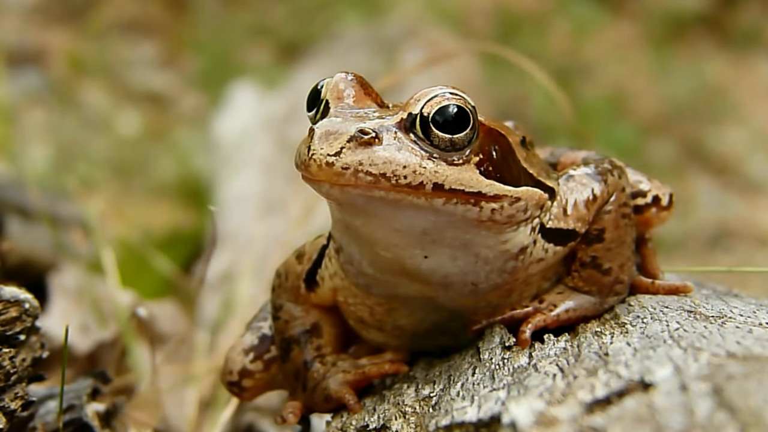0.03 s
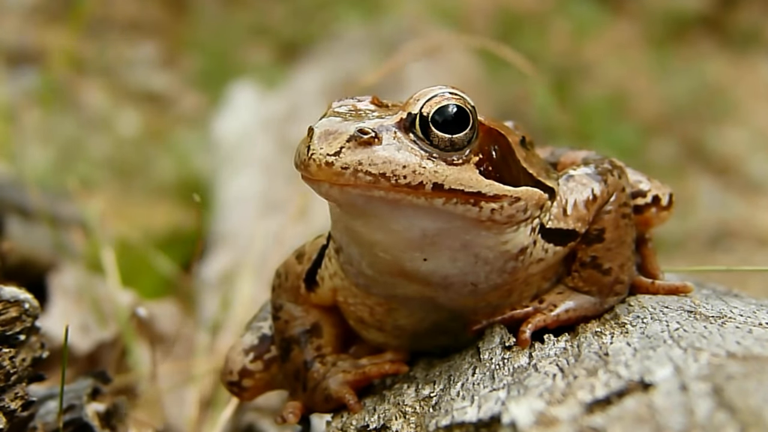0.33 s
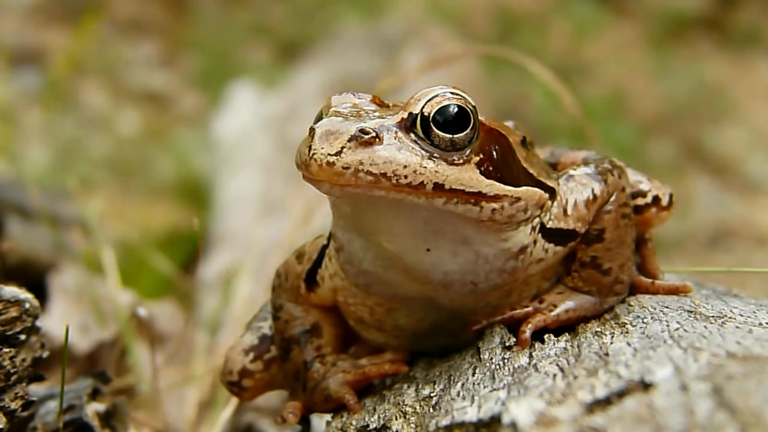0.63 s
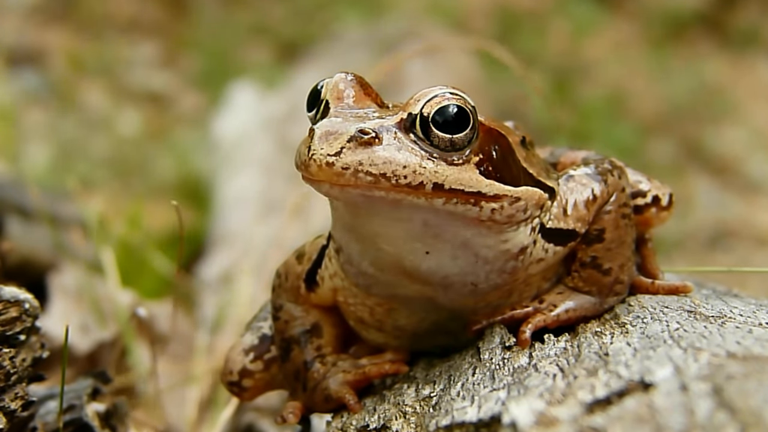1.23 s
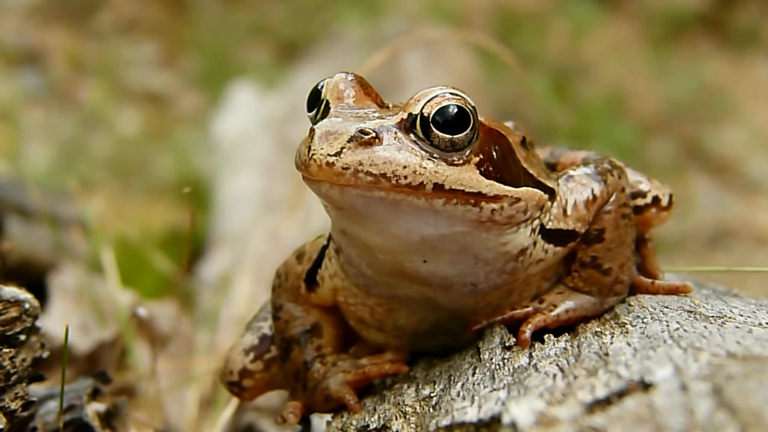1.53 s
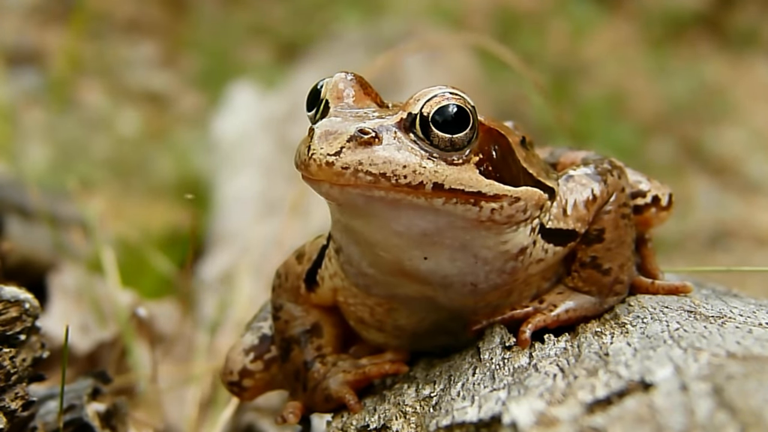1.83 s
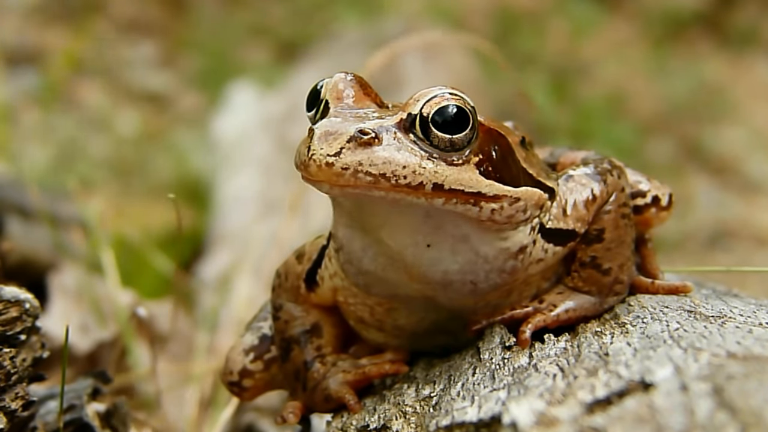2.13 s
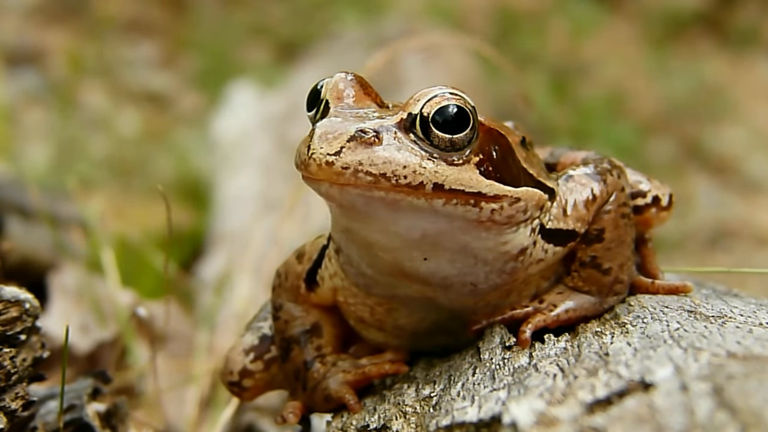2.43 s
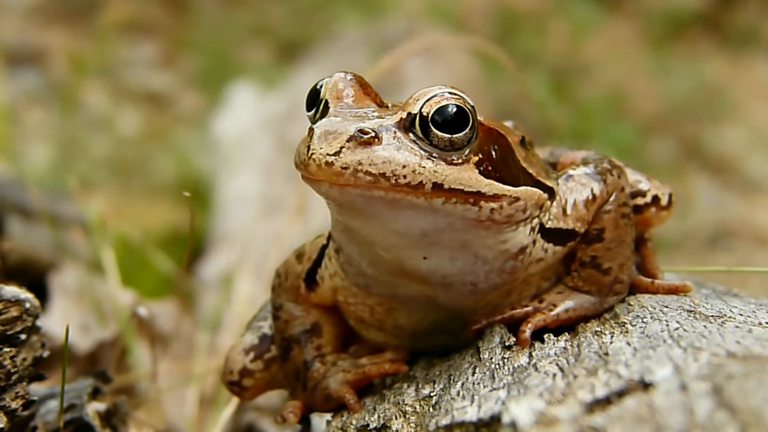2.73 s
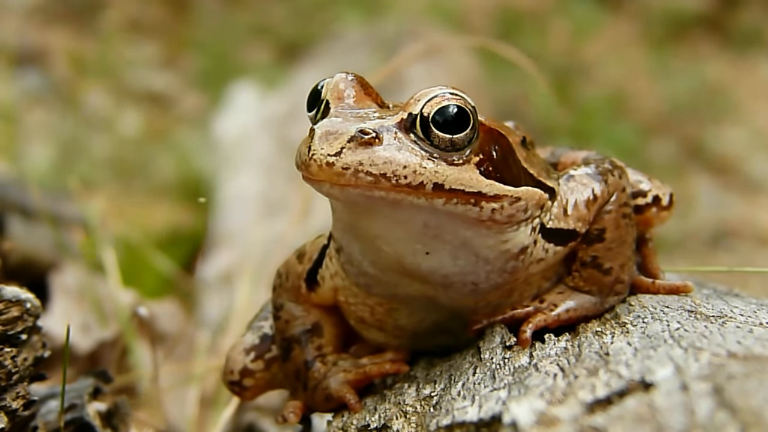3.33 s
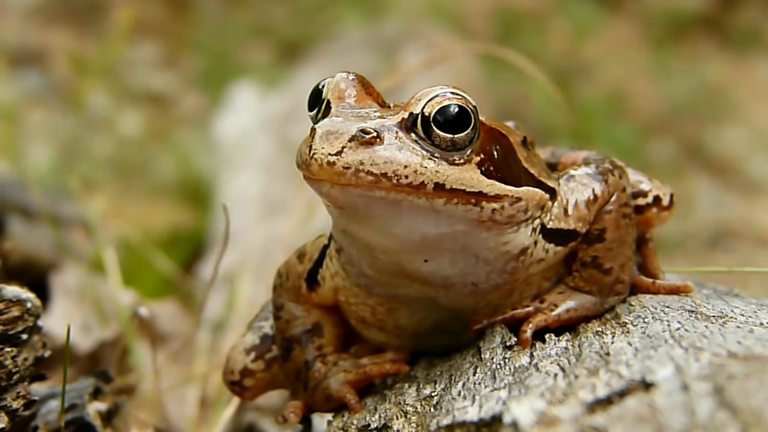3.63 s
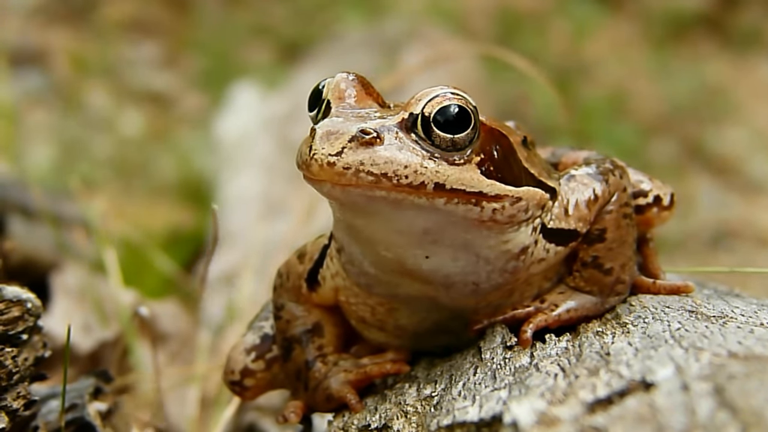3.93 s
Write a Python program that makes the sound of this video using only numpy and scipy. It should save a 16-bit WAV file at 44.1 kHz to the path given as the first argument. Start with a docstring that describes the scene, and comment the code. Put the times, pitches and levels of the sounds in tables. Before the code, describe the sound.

Gusty wind rumbles and thumps on a stereo microphone close to the ground outdoors. Dry leaves rustle and snap faintly to the right, and in the second half an insect chirps softly in the grass.

```python
"""Gusty wind buffets a stereo microphone close to the ground: turbulence rumbles on its two ports
and single eddies thump against them. Further off the air hisses, a few faint hollow tones sound
in the distance, and dry leaves rustle and snap to the right. In the second half an insect in the
grass chirrs faintly, each chirp a tick and a run of scraping strokes."""
import sys
import numpy as np
from scipy import signal
from scipy.io import wavfile

SR = 44100
rng = np.random.default_rng(int(sys.argv[2]) if len(sys.argv) > 2 else 0)


def pcm_store(signal):
    """Save signal as 16-bit PCM."""
    levels = np.round(np.clip(np.atleast_2d(signal), -1, 1) * 32767)
    wavfile.write(sys.argv[1], SR, levels.astype(np.int16).T)


N = 176400
T = np.arange(N) / SR

# Spectra give relative level per Hz. Pan is left minus right. Likeness 1 is the same on both sides.
# distant air: f/Hz, level/dB
AIR_SPECTRUM = [(30, -2.5), (150, -2), (420, 9.5), (560, -1.5), (850, 3), (1500, -7.5), (2400, -8),
                (3600, -9), (5200, -7), (6600, -10.5), (7600, -14.5), (9200, -30.5)]
# stereo image of the air: f/Hz, likeness
AIR_IMAGE = [(60, 0.93), (300, 0.66), (480, 0.043), (850, 1), (1500, 0.98), (3500, 0.72), (6000, 0.9),
             (10000, 0.015)]
# hollow tones far off: t/s, length/s, f/Hz, level/dB
DISTANT_TONES = [(1.408, 0.048, 770, -46), (3.184, .05, 675, -52), (3.515, 0.049, 736, -50),
                 (3.582, 0.023, 705, -45.5), (3.81, 0.093, 758, -52)]
# leaf rustle: f/Hz, level/dB
LEAF_SPECTRUM = [(400, 3.5), (1200, 2), (1900, 5.5), (2800, 4.5), (3500, -6.5), (5000, -2.5), (6600, -11),
                 (7400, -31)]
# rise and fall of the rustle: t/s, level/dB
LEAF_SWELL = [(0, 2.5), (1.0, -1.5), (1.6, 1.5), (2.3, 2.5), (3.2, 0), (4, 2.5)]
# dry leaves snapping: t/s, level/dB, f/Hz, bandwidth/Hz
LEAF_SNAPS = [(0.079, -34, 2160, 900), (0.087, -41, 5900, 2950), (0.344, -32, 2600, 990),
              (.752, -43, 2980, 2500), (0.826, -34, 2280, 1290), (.859, -51, 3940, 4000),
              (0.886, -36.5, 3100, 3430), (0.973, -39, 2870, 2000), (1.109, -46, 4700, 800),
              (1.13, -36, 5000, 800), (1.736, -43.5, 5040, 3020), (1.821, -37.5, 3130, 800),
              (1.880, -36, 2520, 1190), (2.207, -36.5, 2830, 700), (2.634, -35.5, 2140, 900),
              (2.761, -38, 2800, 700), (3.074, -34.5, 2100, 1300), (3.569, -35.5, 1900, 700),
              (3.596, -34.5, 2460, 600), (3.904, -38.5, 3200, 700)]
# the insect's chirps: t/s, length/s, level/dB
INSECT_CHIRPS = [(2.229, 0.054, -52), (2.319, .06, -50), (2.41, 0.068, -47.5), (2.501, 0.11, -50.5),
                 (2.589, 0.087, -50.5), (2.7, 0.089, -48), (2.811, 0.066, -47.5), (2.904, 0.067, -46.5),
                 (2.997, 0.068, -47), (3.09, 0.13, -46), (3.243, 0.064, -47), (3.337, .075, -47.5),
                 (3.437, 0.088, -46), (3.550, 0.074, -47), (3.632, 0.086, -49), (3.747, 0.04, -46.5)]
# its scraping: f/Hz, level/dB
SCRAPE_SPECTRUM = [(3000, -17), (4200, -1.5), (5000, 8), (6200, 9), (7400, 6.5), (8600, -1.5),
                   (10000, -70.5)]
# first stroke of a chirp: f/Hz, level/dB
TICK_SPECTRUM = [(3000, -18), (5000, -12), (7000, 48), (8600, -27), (10000, -40)]
# flow between the gusts: t/s, level/dB
LULL_FLOW = [(0, -37.5), (.3, -45), (.93, -40), (1.3, -44.5), (1.55, -45), (1.62, -55), (1.68, -49),
             (1.98, -40.5), (2.16, -48.5), (2.6, -41.5), (2.75, -51), (2.9, -47), (3.5, -49), (3.72, -56),
             (3.8, -52.5), (4, -46)]
# gusts on the microphone: start t/s, end t/s, level/dB, pan/dB
MIC_GUSTS = [(-.02, 0.071, -31, 0), (0.177, 0.271, -35, 4), (0.337, 0.383, -28, 1.5),
             (0.463, 0.532, -27, 3), (0.592, 0.683, -24, 1.5), (0.703, 0.876, -30, 1),
             (1, 1.138, -32.5, 1.5), (1.151, 1.27, -26.5, 1.5), (1.325, 1.359, -33, 1),
             (1.406, 1.544, -35.5, 0.5), (1.722, 1.91, -36.5, -1.5), (1.93, 1.942, -27, 1),
             (2.018, 2.065, -29, 1), (2.196, 2.282, -32, 2.5), (2.268, 2.352, -26, 1),
             (2.364, 2.488, -34.5, -1), (2.5, 2.56, -42, -4), (2.813, 2.873, -43, 6),
             (2.928, 3.094, -42, 2), (3.157, 3.27, -39, 0.5), (3.26, 3.452, -36.5, 0.5),
             (3.495, 3.66, -48, 3), (3.75, 3.761, -35.5, 3), (3.817, 3.87, -39, -8), (3.934, 4.02, -35, 1)]
# eddies hitting the ports: t/s, level/dB, f/Hz, pan/dB, level of the turbulence round each/dB
PORT_EDDIES = [(0.215, -13.5, 119, 2.5, -23.5), (0.34, -16.5, 151, 10, -26), (0.358, -33, 207, 3, -22),
               (0.519, -15, 196, 0, -21), (0.561, -16, 196, 1.5, -19.5), (0.668, -15.5, 242, 9, -24),
               (0.782, -9.5, 205, -2, -19), (.889, -22, 232, 3.5, -19), (0.999, -16.5, 176, 4, -43),
               (1.154, -15, 250, -1.5, -24), (1.264, -14.5, 200, 10, -38), (1.708, -17, 197, -2.5, -23.5),
               (1.830, -13.5, 175, 8, -24), (2.128, -14, 268, 2, -17.5), (2.230, -20, 149, 0, -29),
               (2.39, -22, 202, 7, -27), (2.667, -12.5, 205, -0.5, -32), (2.810, -30, 173, -5, -29.5),
               (3.126, -22.5, 94, 4.5, -46), (3.189, -15.5, 170, 6.5, -26), (3.301, -16, 148, 11, -28.5),
               (3.556, -24.5, 163, -4, -38), (3.624, -20, 172, 3.5, -27), (3.835, -23.5, 130, -11, -45),
               (3.956, -16.5, 140, 19, -33.5)]
# turbulence in a brisk flow: f/Hz, level/dB
RUMBLE_SPECTRUM = [(25, -25.5), (50, -21.5), (100, -5), (170, 1.5), (260, -6.5), (400, -12), (700, -20.5),
                   (1400, -35), (2600, -47), (5500, -61.5)]
# growth of the rumble with the flow: f/Hz, slope/(dB per dB)
RUMBLE_GROWTH = [(40, -0.1), (90, 0.03), (170, .9), (300, 1.4), (500, 1.58), (800, 2), (2000, 1.78)]
# stereo image of the rumble: f/Hz, likeness
PORT_IMAGE = [(40, 1), (150, 0.29), (350, 0.86), (700, 0.83), (2000, 0.99)]
# balance between the ports: f/Hz, pan/dB
PORT_PAN = [(40, -1.5), (160, 4.5), (400, -2.5), (1000, -3.5)]

AIR_DB, AIR_PAN_DB, DISTANCE_CUT_HZ = -47, 1, 8340
LEAVES_DB, LEAVES_PAN_DB, LEAVES_GRAIN_DB = -48, -12, 3.5
STROKES_PER_S, STROKE_DEPTH, STROKE_SCATTER_DB = 120, 0.35, 1.5
TICK_DB, SCRAPE_FLICKER_DB, INSECT_LIKENESS = 7.5, 3.5, 0.89
GUST_FADE_S, EDDY_STIR_S = 0.012, 0.0074
RUMBLE_DB, FLUTTER_DB, BRISK_DB, CALM_DB = 1, 2.92, -29, -40.5
EDDY_WIDTH_CYCLES, EDDY_SCATTER_CYCLES, PORT_TURN_HZ = 0.52, 0.051, 310
NOTCH_HZ, NOTCH_WIDTH_HZ, CUTOFF_HZ = 7965, 1480, 10250


def from_db(db):
    return 10 ** (np.asarray(db) / 20)


def rms_one(x):
    return x / np.sqrt(np.mean(x ** 2) + 1e-20)


def at_hz(table, hz):
    """Reads a table on a log-frequency axis."""
    freqs, values = np.transpose(table)
    return np.interp(np.log(hz), np.log(freqs), values)


def pan(db):
    """Left and right gains of mean power 1."""
    return rms_one(from_db([[db / 2], [-db / 2]]))


def drift(hz):
    """Random wander of rms about 1, mostly slower than hz."""
    step, settle = 40, 2000
    pole = np.exp(-2 * np.pi * hz * step / SR)
    white = rng.standard_normal(N // step + settle + 2)
    slow = signal.lfilter([1], [1, -2 * pole, pole * pole], white)[settle:]
    return np.interp(np.arange(N) / step, np.arange(len(slow)), rms_one(slow))


def envelope(start, end, attack_s, release_s):
    """Rises up to the start, holds, dies away after the end."""
    rise = np.clip((T - start) / attack_s + 1, 0, 1)
    return rise * np.exp(-np.clip((T - end) / release_s, 0, 20))


def bandpass(x, low, high):
    return signal.sosfilt(signal.butter(2, [low, high], "band", fs=SR, output="sos"), x)


def narrow_noise(hz, width_hz):
    """Noise of rms 1 round one pitch."""
    return rms_one(bandpass(rng.standard_normal(N), hz - width_hz / 2, hz + width_hz / 2))


def noise_bands(spectrum, likeness, count):
    """Stereo noise as (f/Hz, band) pairs; the bands add up to rms 1."""
    edges = np.geomspace(spectrum[0][0], spectrum[-1][0], count + 1)
    white, bands = rng.standard_normal((2, 2, N)), []
    for k, (low, high) in enumerate(zip(edges, edges[1:])):
        mid, side = bandpass(white[k % 2], low, high)
        hz = np.sqrt(low * high)
        alike = likeness if np.isscalar(likeness) else at_hz(likeness, hz)
        stereo = np.sqrt(1 + alike) * mid + np.sqrt(1 - alike) * side * [[1], [-1]]
        bands.append((hz, from_db(at_hz(spectrum, hz)) * stereo))
    total = np.std(sum(band for _, band in bands))
    return [(hz, band / total) for hz, band in bands]


def noise(spectrum, likeness, count):
    """Coloured stereo noise of rms 1."""
    return sum(band for _, band in noise_bands(spectrum, likeness, count))


def distant_air():
    """A steady, wide hiss at the back of the scene."""
    return from_db(AIR_DB) * pan(AIR_PAN_DB) * noise(AIR_SPECTRUM, AIR_IMAGE, count=24)


def far_tones():
    """Brief wavering tones a long way off, barely above the air."""
    return sum(from_db(db) * envelope(t, t + length, 0.015, 0.015) * narrow_noise(hz, width_hz=95)
               for t, length, hz, db in DISTANT_TONES)


def leaf_rustle():
    """Dry leaves right of the microphone; each band flickers on its own, which makes the grain."""
    swell_db = np.interp(T, *np.transpose(LEAF_SWELL))
    flicker_db = LEAVES_GRAIN_DB * (drift(180) + drift(6)) / 2
    bands = noise_bands(LEAF_SPECTRUM, likeness=0.43, count=14)
    grains = sum(band * from_db(LEAVES_GRAIN_DB * drift(60)) for _, band in bands)
    return pan(LEAVES_PAN_DB) * from_db(LEAVES_DB + swell_db + flicker_db) * grains


def leaf_snaps():
    """Single leaves snap in the same spot, each a short burst round its own pitch."""
    snaps = sum(from_db(db) * envelope(t, t + 0.00067, 0.00033, 0.0034) * narrow_noise(hz, width)
                for t, db, hz, width in LEAF_SNAPS)
    return pan(LEAVES_PAN_DB) * snaps


def insect():
    """In the grass near by: each chirp opens with a bright tick and goes on in uneven scraping strokes."""
    chirps = sum(from_db(db) * envelope(t, t + length, attack_s=0.00067, release_s=0.019)
                 for t, length, db in INSECT_CHIRPS)
    ticks = sum(from_db(db + TICK_DB) * envelope(t + 0.0028, t + 0.0052, 0.00083, 0.0028)
                for t, _, db in INSECT_CHIRPS)
    stroke_rate = STROKES_PER_S * (1 + 0.2433 * drift(34.7))
    strokes = 1 + STROKE_DEPTH * np.sin(2 * np.pi * np.cumsum(stroke_rate) / SR)
    strokes *= from_db(STROKE_SCATTER_DB * drift(STROKES_PER_S))
    bands = noise_bands(SCRAPE_SPECTRUM, INSECT_LIKENESS, count=16)
    scrape = sum(band * from_db(SCRAPE_FLICKER_DB * drift(68)) for _, band in bands)
    return chirps * strokes * rms_one(scrape) + ticks * noise(TICK_SPECTRUM, INSECT_LIKENESS, count=6)


def port_flow():
    """Strength of the turbulence at each port: lull, gusts and the stir round each eddy add in power."""
    power = from_db(np.interp(T, *np.transpose(LULL_FLOW))) ** 2
    for start, end, db, pan_db in MIC_GUSTS:
        gust = from_db(db) * pan(pan_db) * envelope(start, end, GUST_FADE_S, GUST_FADE_S)
        power = power + gust ** 2
    for t, _, _, pan_db, stir_db in PORT_EDDIES:
        stir = from_db(stir_db) * pan(pan_db) * envelope(t, t, EDDY_STIR_S, EDDY_STIR_S)
        power = power + stir ** 2
    return np.sqrt(power)


def port_rumble():
    """Turbulence right on the ports; a stronger flow makes it louder and brighter."""
    flow, shared_drift, rumble = port_flow(), drift(22.5), 0
    briskness = np.maximum(flow, from_db(CALM_DB)) / from_db(BRISK_DB)  # below calm the colour holds
    for hz, band in noise_bands(RUMBLE_SPECTRUM, PORT_IMAGE, count=15):
        flutter = from_db(FLUTTER_DB * (shared_drift + drift(45)) / 2)
        tilt = briskness ** (at_hz(RUMBLE_GROWTH, hz) - 1)
        rumble += band * flutter * tilt * pan(at_hz(PORT_PAN, hz))
    return from_db(RUMBLE_DB) * flow * rumble


def eddy_thumps():
    """Each eddy is one short swing of pressure, felt a little differently at each port."""
    thumps = np.zeros((2, N))
    for t, db, hz, pan_db, _ in PORT_EDDIES:
        phase, chance = rng.random(2)
        right_lag = EDDY_SCATTER_CYCLES * (2 * chance - 0.5)
        port_phases = np.array([[phase], [phase - right_lag]])
        cycles = (T - t) * hz
        near = np.abs(cycles) < 10
        window = np.exp(-(cycles[near] / EDDY_WIDTH_CYCLES) ** 2 / 2)
        swing = np.sin(2 * np.pi * (cycles[near] + port_phases))
        thumps[:, near] += from_db(db) * pan(pan_db) * window * swing
    return thumps


def wind():
    """Wind on the microphone: the air reaches the right port later than the left."""
    left, right = port_rumble() + eddy_thumps()
    pole = np.exp(-2 * np.pi * PORT_TURN_HZ / SR)
    late_right = signal.lfilter([-pole, 1], [1, -pole], right)  # all-pass: the lows lag most
    return np.array([left, late_right])


def scene():
    """Wind on the microphone, the insect near by; the sounds further off lose their top."""
    air = distant_air()
    close = wind() + insect()
    far = air + leaf_rustle() + leaf_snaps() + far_tones()
    distance = signal.butter(6, DISTANCE_CUT_HZ, fs=SR, output="sos")
    return close + signal.sosfilt(distance, far)


def record(dry):
    """The recorder has a notch in the treble and cuts the top steeply."""
    notch = signal.iirnotch(NOTCH_HZ, NOTCH_HZ / NOTCH_WIDTH_HZ, fs=SR)
    top_cut = signal.cheby2(18, 45, CUTOFF_HZ, fs=SR, output="sos")
    return signal.sosfilt(top_cut, signal.lfilter(*notch, dry))


dry = scene()
out = record(dry)
pcm_store(out)
```